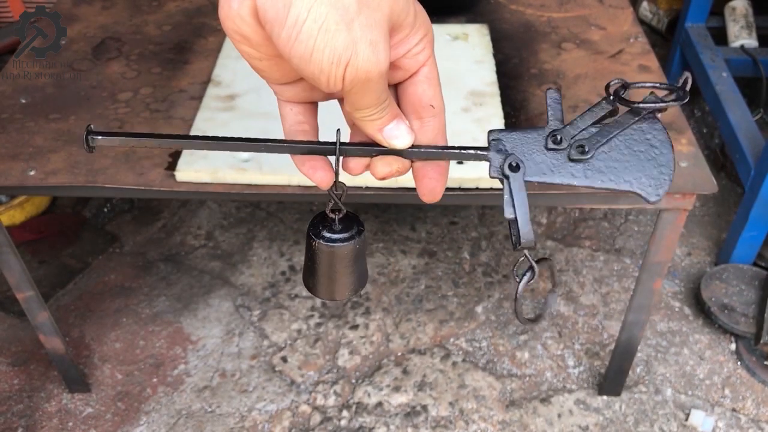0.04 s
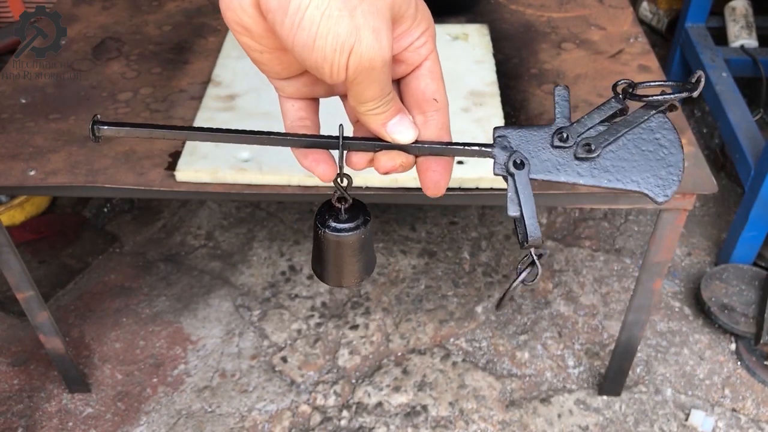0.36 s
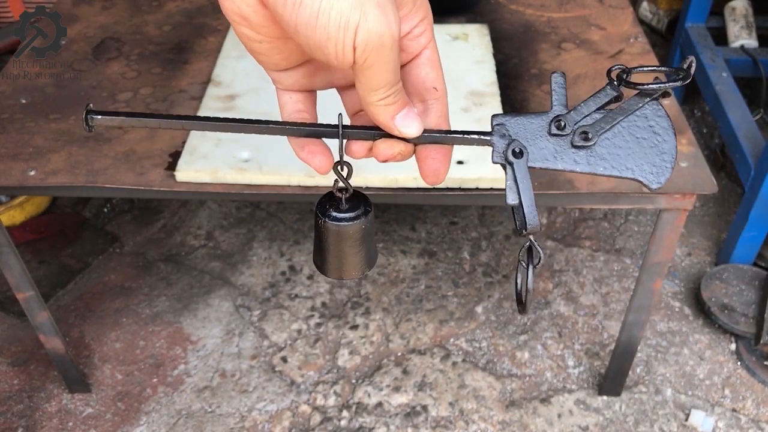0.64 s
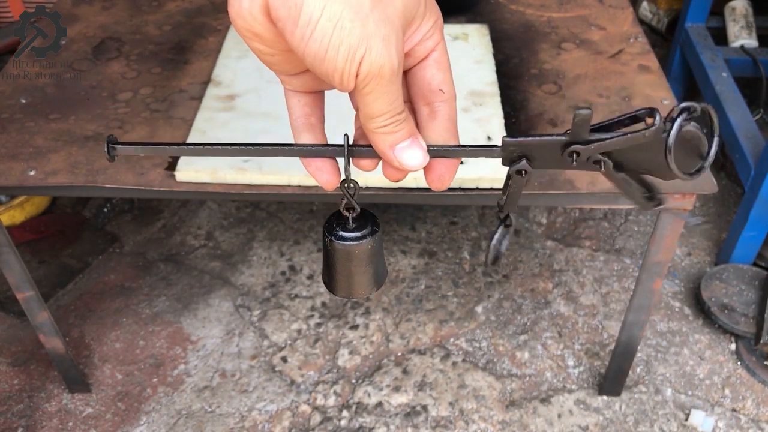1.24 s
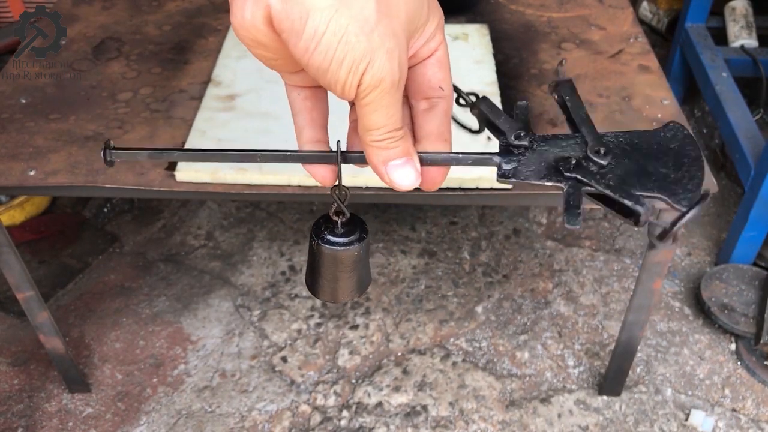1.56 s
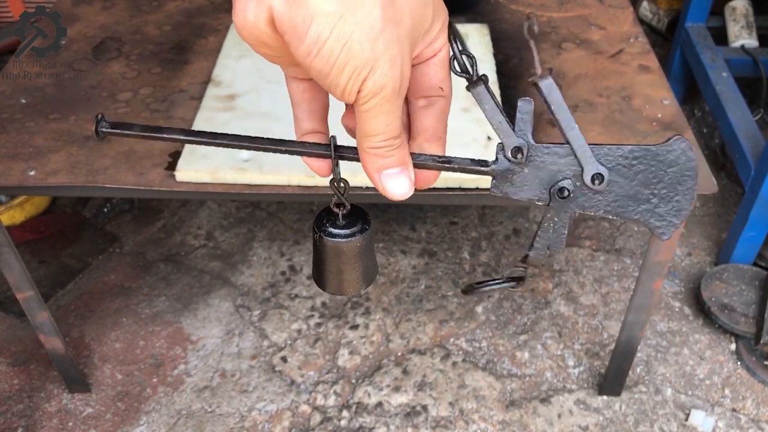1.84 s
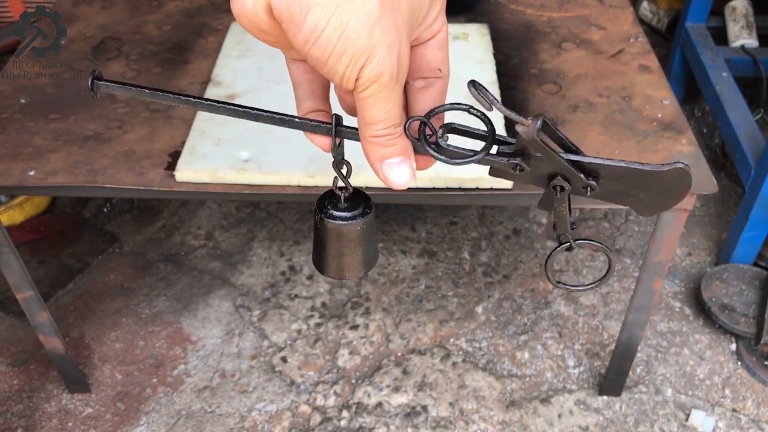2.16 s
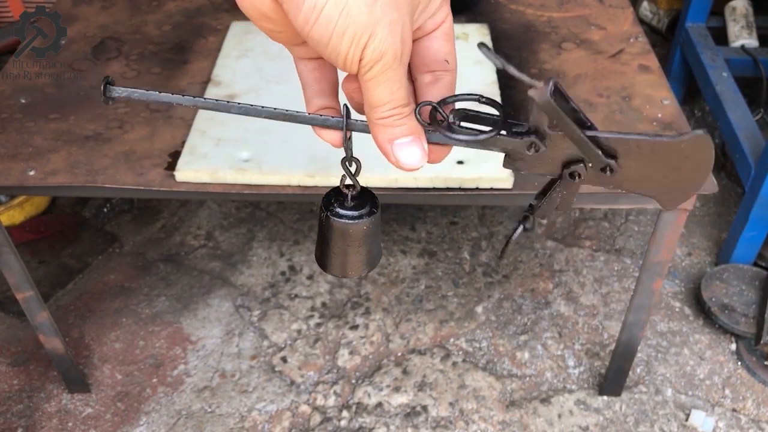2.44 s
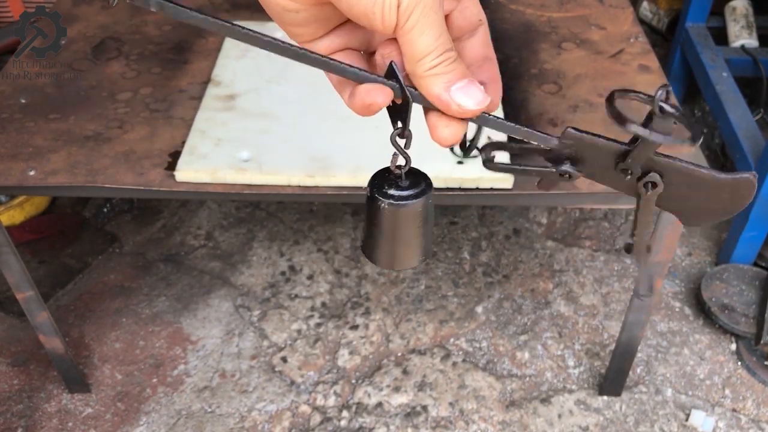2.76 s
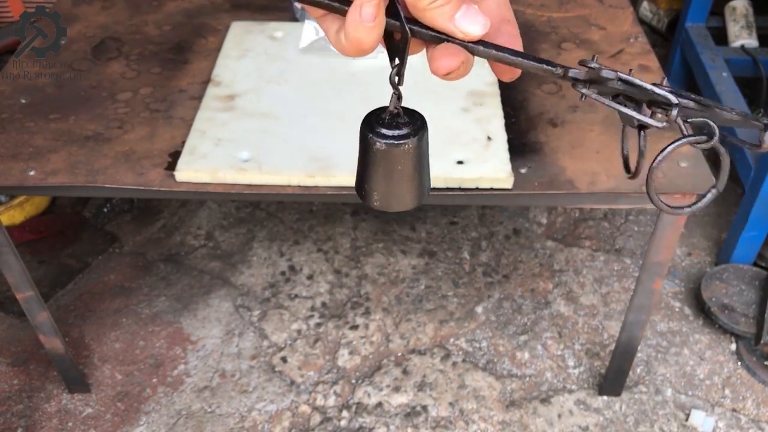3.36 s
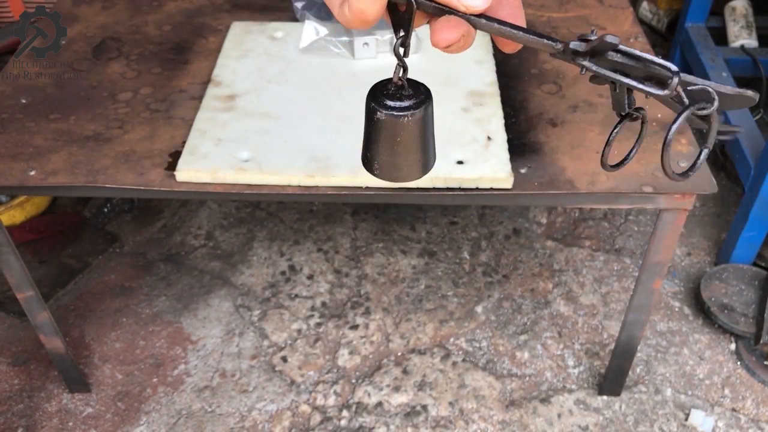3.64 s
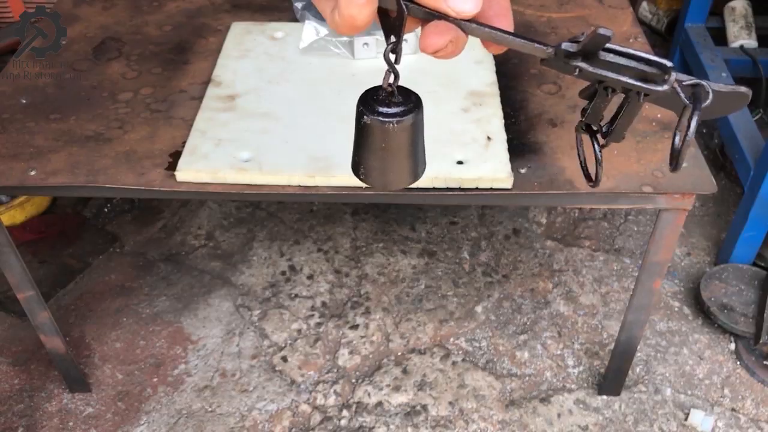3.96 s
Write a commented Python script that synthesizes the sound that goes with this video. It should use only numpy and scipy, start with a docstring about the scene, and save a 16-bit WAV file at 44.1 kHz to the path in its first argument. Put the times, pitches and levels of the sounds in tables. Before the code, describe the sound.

Loose metal fittings on a hand-held scale give short, bright clinks over a low workshop hum.

```python
"""A workshop, close to the bench: a hand turns a small steel beam scale over. Its rings, hook, links,
pins and straps swing against each other and the flat head plate, each contact a short bright ring over
a dry clack. In between, the fittings scrape faintly and the joints snap as they take up their slack.
The room answers faintly. Underneath lie room tone, a thin hiss, the hum and whine of a far motor,
and a low rumble that swells during the turn."""
import sys
import numpy as np
from scipy import signal
from scipy.fft import rfft, irfft
from scipy.io import wavfile

SR = 44100
rng = np.random.default_rng(int(sys.argv[2]) if len(sys.argv) > 2 else 0)


def store_wav(level_fs):
    """Save 16-bit WAV to argv[1]."""
    pcm = np.round(np.clip(np.atleast_2d(level_fs), -1, 1) * 32767)
    wavfile.write(sys.argv[1], SR, pcm.T.astype(np.int16))


N = 176400
TIME = np.arange(N) / SR
RING_TIME = TIME[:SR // 6]

# colours of the room tone, the rumble and the hiss: (frequency [Hz], relative level [dB])
ROOM_TONE_COLOUR = [(25, -26), (45, 3.5), (75, -3), (120, -8), (158, -11.5), (195, -1), (253, -12),
                    (421, -12), (520, -15.5), (660, -17.5), (860, -16.5), (1270, -20.5), (1600, -21),
                    (2010, -26.5), (2550, -26), (3000, -30), (3450, -31), (3800, -23.5), (4300, -35),
                    (7000, -41.5), (10900, -51), (15500, -45)]
RUMBLE_COLOUR = [(25, -8), (48, 0.5), (100, 2), (170, -11), (300, -27), (800, -72)]
HISS_COLOUR = [(3000, -7.5), (5500, 1), (9000, -4.5), (14000, -6.5), (15200, -4), (15650, 9), (16000, -5.5)]
# contour of the rumble, before rumble() widens its swings: (time [s], level [dB])
RUMBLE_CONTOUR = [(0.0, -53), (0.04, -69), (1.61, -50), (1.69, -36), (1.74, -47), (1.83, -38.5),
                  (1.96, -37.5), (1.99, -41.5), (2.13, -39), (2.27, -49.5), (2.48, -40), (2.77, -43),
                  (2.92, -40.5), (2.96, -50.5), (4.0, -61)]
# fader ride of the hiss: (time [s], level [dB])
HISS_RIDE = [(0, -75), (.47, -65.5), (.54, -75), (1.17, -74), (1.25, -72), (1.5, -62), (1.8, -69),
             (2.2, -74), (2.4, -74), (2.65, -70), (2.72, -61.5), (3.2, -65.5), (4, -69.5)]
# the motor's upper and lower tones: (frequency [Hz], rms level [dB])
MOTOR_WHINE = [(211, -57.5), (550, -62.5), (601.5, -59.5), (812, -64.5), (899.5, -67), (1498.8, -54),
               (1699, -67), (1899, -66), (2950, -72.5)]
MOTOR_HUM = [(54, -65), (99, -56.5), (139, -58), (177, -56.5), (226, -59), (300, -66)]
# fittings sliding on each other:
# (start [s], end [s], low resonance [Hz], its level [dB], level of the high resonance [dB])
SCRAPES = [(1.04, 1.22, 4700, -70, -90), (1.653, 1.795, 5340, -65, -66), (1.795, 1.98, 4180, -70, -78),
           (2.68, 2.776, 3940, -59, -71), (2.835, 2.877, 5100, -54.5, -71.5), (2.865, 2.91, 5300, -61, -68),
           (3.62, 3.75, 6060, -71, -70)]
# joints pulling tight: (time [s], level [dB])
SNAP_CUES = [(1.6584, -33), (1.9838, -45), (2.141, -45), (2.8142, -43), (2.837, -25.5), (2.9464, -25),
             (3.0327, -30)]
# colours of a snap and of the head plate: (frequency [Hz], relative level [dB])
SNAP_COLOUR = [(2000, -14), (5000, -9), (9000, -13.5), (12000, -7), (14800, -9), (16500, 0)]
PLATE_COLOUR = [(600, -41.5), (1500, -3), (2400, -5), (4000, 0), (7000, 4), (10000, 4), (12800, -9),
                (14500, 5), (16500, 2)]
# modes of each loose part, by name: (frequency [Hz], relative level [dB], t60 [s])
PART_MODES = { "ring": [(3790, -18, .03), (4300, -17, .03), (5800, -13, .03), (6115, -17, .08),
              (6985, -3, .042), (8150, -16, .06), (9680, -12, .08), (7500, -12, .05), (10910, -6, .045),
              (11900, -7, .035), (14195, -2, .06)], "loop": [(2700, -21, .025), (3747, -9, .048),
              (4650, -15, .03), (5652, -17, .055), (6115, -19, .1), (6955, -7, .042), (8150, -17, .06),
              (9680, -10, .085), (10190, -21, .1), (10910, -2, .055), (11930, -5, .048), (14190, -5, .07)],
              "hook": [(2470, -5, .035), (2650, -10, .03), (4215, -2, .036), (5450, -5, .024),
              (7010, -3, .05), (7530, -4, .05), (9250, -3, .028), (10950, -6, .03), (11250, -5, .025),
              (11880, -6, .04), (13900, -7, .045), (14520, 2, .028), (15630, -12, .038)],
              "link": [(3225, -19, .037), (5330, -10, .05), (5400, -14, .075), (6610, -9, .06),
              (6790, -14, .035), (9730, -2, .048), (13680, -15, .045), (14470, -10, .04)],
              "swivel": [(4280, -13, .03), (6900, -11, .025), (8170, -9, .07), (8490, -8, .04),
              (11650, -17, .05), (13980, 0, .045), (14450, -14, .06)], "pin": [(6790, -21, .07),
              (7500, -18, .06), (9700, -19, .04), (10190, -21, .07), (14190, 0, .052), (14420, -8, .05)],
              "shackle": [(4985, -16, .045), (8950, -7, .03), (9160, 0, .045), (11935, -7, .025),
              (13600, -3, .035), (13800, -4, .04)], "strap": [(3850, -8, .02), (4235, -4, .018),
              (5600, -9, .018), (7505, -1, .028), (9700, -9, .025), (10940, -8, .04), (14000, -8, .02),
              (15600, -8, .02)], "eyelet": [(5280, -15, .04), (6800, 0, .035)], }
# steel meeting steel: (time [s], part, ring gain [dB], brightness [dB/octave], clack gain [dB])
CONTACT_CUES = [ (0.0481, "hook", -25, 2, -26.5), (0.088, "ring", -50, -24, -43),
                (0.0946, "ring", -21, -6.5, -16), (0.096, "pin", -16, -3, -42),
                (0.102, "link", -29.5, 27, -36), (0.1073, "loop", -35.5, -8, -27),
                (1.1988, "loop", -52.5, -16, -53), (1.221, "loop", -48, -9, -43),
                (1.2502, "link", -51, 4, -25.5), (1.253, "loop", -25, -0.5, -25.5),
                (1.298, "loop", -36, 6, -35), (1.3040, "loop", -38, -10.5, -38),
                (1.4097, "link", -31, 8, -33), (1.417, "swivel", -33, 4, -31),
                (1.4220, "loop", -30.5, 2, -36), (1.426, "swivel", -25.5, 2, -31.5),
                (1.655, "strap", -53.5, -13, -41), (1.659, "shackle", -49, 24, -32),
                (1.6720, "link", -47.5, -12, -55), (1.7095, "pin", -61, -2, -51),
                (1.7535, "shackle", -66, 10, -49), (1.9843, "strap", -41.5, -6, -41),
                (2.071, "pin", -33, -3, -41.5), (2.101, "strap", -49, -5, -50),
                (2.1382, "strap", -53, 7, -38.5), (2.1412, "swivel", -28.5, 0, -32),
                (2.1683, "swivel", -53.5, -21, -43), (2.1813, "eyelet", -49, 0, -58),
                (2.2328, "link", -30, -3.5, -30), (2.2718, "link", -58, -14, -48),
                (2.7058, "pin", -57, -5, -40), (2.761, "link", -49, 5, -39),
                (2.777, "shackle", -33, 8, -30.5), (2.8637, "shackle", -53.5, 29, -62),
                (2.911, "shackle", -52, 2, -38.5), (2.9263, "eyelet", -48, 0, -49),
                (2.95, "eyelet", -33, 0, -51), (2.962, "swivel", -33, 5, -30),
                (2.9659, "hook", -26.5, 2, -25), (3.0133, "link", -46, -9, -54),
                (3.0335, "pin", -18.5, 5, -29.5), (3.0398, "eyelet", -50, 7, -33),
                (3.072, "hook", -49, 1, -41), (3.0875, "hook", -58, -8.5, -39),
                (3.1176, "link", -57, -17.5, -44), (3.131, "strap", -51.5, -7, -53),
                (3.577, "link", -73, -23, -47), (3.6390, "swivel", -52.5, -8, -56),
                (3.7794, "link", -36.5, 1, -46), (3.784, "link", -35.5, 3, -40), ]


def from_db(db):
    """Decibels to gain."""
    return 10 ** (np.asarray(db) / 20)


def unit_rms(x):
    """Scale to unit rms."""
    return x / np.sqrt(np.mean(x ** 2) + 1e-20)


def gain_at(colour, hz):
    """Read a colour as gain along a log-frequency axis."""
    points_hz, db = np.transpose(colour)
    return from_db(np.interp(np.log(np.maximum(hz, 1)), np.log(points_hz), db))


def decay(t, t60):
    """Exponential fade, 60 dB down at t60."""
    return np.exp(-np.log(1000) * t / t60)


def noise(colour, size):
    """Coloured noise of unit rms."""
    white = rfft(rng.standard_normal(size))
    return unit_rms(irfft(white * gain_at(colour, np.fft.rfftfreq(size, 1 / SR)), size))


def drift(turns_per_s):
    """Slow random wander."""
    knots = rng.standard_normal(400)
    return np.interp(TIME * turns_per_s, np.arange(len(knots)), knots)


def resonance(x, hz, width_hz):
    """Ring a two-pole resonator; the result has unit rms."""
    radius = np.exp(-np.pi * width_hz / SR)
    poles = [1, -2 * radius * np.cos(2 * np.pi * hz / SR), radius ** 2]
    return unit_rms(signal.lfilter([1, 0, -1], poles, x))


def add(out, start_s, sound):
    """Mix a sound in at its cue."""
    i = int(np.clip(start_s * SR, 0, N - 1))
    out[i:i + len(sound)] += sound[:N - i]


def room_tone(level_db=-46.5):
    """The workshop's steady, dark bed of noise."""
    return from_db(level_db) * noise(ROOM_TONE_COLOUR, N)


def hiss():
    """A thin treble hiss that rises and sinks."""
    level_db = np.interp(TIME, *np.transpose(HISS_RIDE))
    return from_db(level_db) * noise(HISS_COLOUR, N)


def rumble(anchor_db=-38.5, swing=1.54):
    """Bass noise that comes in swells, its contour expanded about the anchor level."""
    contour_db = np.interp(TIME, *np.transpose(RUMBLE_CONTOUR))
    level_db = anchor_db + swing * (contour_db - anchor_db)
    return from_db(level_db) * noise(RUMBLE_COLOUR, N)


def motor(level_waver=0.057, phase_waver_rad=0.114, wavers_per_s=4.21):
    """A far motor holds steady tones, each wavering slightly in level and phase."""
    out = np.zeros(N)
    for hz, db in list(MOTOR_WHINE) + list(MOTOR_HUM):
        phase = 2 * np.pi * (hz * TIME + rng.random()) + phase_waver_rad * drift(wavers_per_s)
        waver = 1 + level_waver * drift(wavers_per_s)
        out += np.sqrt(2) * from_db(db) * waver * np.sin(phase)
    return out


def workshop_echo(x, predelay_s=0.012, top_hz=12200, top_t60_share=0.41):
    """Quick scatter off the bench and a faint longer tail; in both the top dies first."""
    t, response = TIME[:SR], 0
    lowpass = signal.butter(4, top_hz, fs=SR, output="sos")
    for t60, energy_db in ((0.172, -26), (0.56, -23)):   # scatter, tail
        white = rng.standard_normal(SR)
        body = signal.sosfiltfilt(lowpass, white)
        top = white - body
        tail = (body * decay(t, t60) + top * decay(t, t60 * top_t60_share)) * (t > predelay_s)
        response += from_db(energy_db) * tail / np.sqrt(np.sum(tail ** 2))
    return signal.fftconvolve(x, response)[:N]


def scrapes(slips_per_s=710, spread_db=5):
    """Steel slides on steel: a swell of tiny uneven slips excites two resonances."""
    out = np.zeros(N)
    slipping = rng.random(N) < slips_per_s / SR
    strength = from_db(spread_db * rng.standard_normal(N))
    slips = slipping * strength * rng.choice([-1, 1], N)
    for start, end, low_hz, low_db, high_db in SCRAPES:
        run = slips[int(start * SR):int(end * SR)]
        low = from_db(low_db) * resonance(run, low_hz, width_hz=170)
        high = from_db(high_db) * resonance(run, hz=13750, width_hz=400)
        add(out, start, (low + high) * np.sqrt(np.hanning(len(run))))
    return out


def snaps():
    """A joint takes up its slack with a dry, bright burst of noise."""
    out = np.zeros(N)
    envelope = decay(RING_TIME, t60=0.0086)
    for start, db in SNAP_CUES:
        add(out, start, from_db(db) * envelope * noise(SNAP_COLOUR, len(RING_TIME)))
    return out


def plate_clack(slot_hz=260, mean_t60_s=0.03):
    """The head plate: dense modes that change with the spot struck, under a crack and a short clatter."""
    slots = np.arange(1400, 16000, slot_hz)[:, None]
    place, length, polarity = rng.random((3, len(slots), 1))
    hz = slots + place * slot_hz   # one mode somewhere in each slot
    gain = gain_at(PLATE_COLOUR, hz)
    t = RING_TIME[:len(RING_TIME) // 2]
    fade = decay(t, mean_t60_s * (.5 + length))
    modes = gain * np.sign(polarity - .5) * np.sin(2 * np.pi * hz * t) * fade
    crack = from_db(6.5) * decay(RING_TIME, t60=0.003)
    clatter = from_db(-13.5) * decay(RING_TIME, t60=0.03)
    out = (crack + clatter) * noise(PLATE_COLOUR, len(RING_TIME))
    add(out, 0, modes.sum(axis=0) / np.sqrt(np.sum(gain ** 2) / 2))
    return out / 2


def part_ring(part, ring_db, brightness, pivot_hz=9300, spread_db=1.7):
    """A struck part rings in its own modes, and each blow favours different ones."""
    hz, mode_db, t60 = np.transpose(PART_MODES[part])
    tilt_db = brightness * np.log2(hz / pivot_hz)
    gain = from_db(ring_db + mode_db + tilt_db + spread_db * rng.standard_normal(len(hz)))
    modes = np.sin(2 * np.pi * hz[:, None] * RING_TIME) * decay(RING_TIME, t60[:, None])
    return (gain * rng.choice([-1, 1], len(hz))) @ modes


def contacts():
    """The swinging parts meet: each hit layers a bright ring over the plate's dry clack."""
    out = np.zeros(N)
    for start, part, ring_db, brightness, clack_db in CONTACT_CUES:
        add(out, start, part_ring(part, ring_db, brightness) + from_db(clack_db) * plate_clack())
    return out


def scene():
    """The scale up close, with a touch of room, over the workshop bed."""
    bed = hiss() + room_tone() + rumble() + motor()
    small_parts = signal.butter(4, 1550, "high", fs=SR, output="sos")   # the steel keeps no low end
    steel = signal.sosfilt(small_parts, contacts() + snaps() + scrapes())
    return (bed + steel + workshop_echo(steel))[None]


def record(dry):
    """Roll off the deepest bass and cut the top steeply."""
    low_cut = signal.butter(6, 31, "high", fs=SR, output="sos")
    high_cut = signal.ellip(10, .1, 70, 15900, fs=SR, output="sos")
    return signal.sosfilt(high_cut, signal.sosfilt(low_cut, dry))


dry = scene()
out = record(dry)
store_wav(out)
```